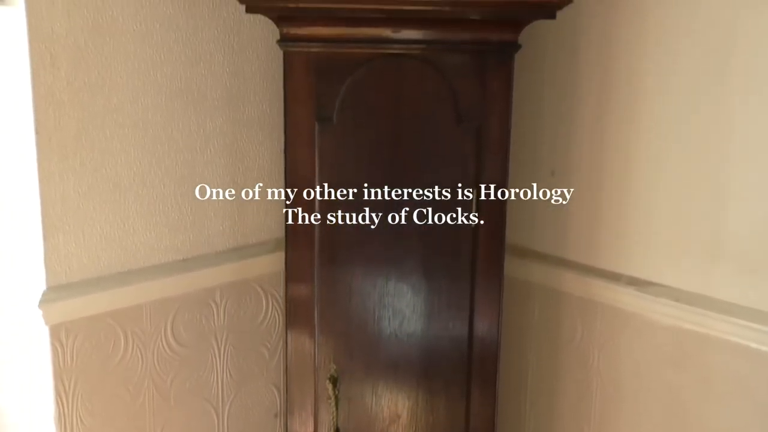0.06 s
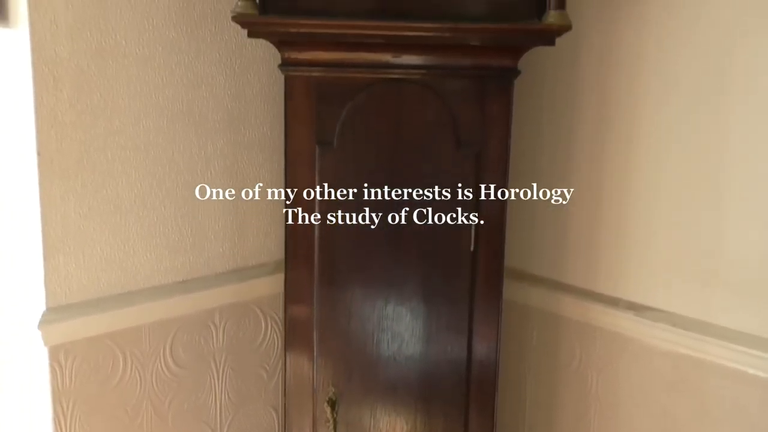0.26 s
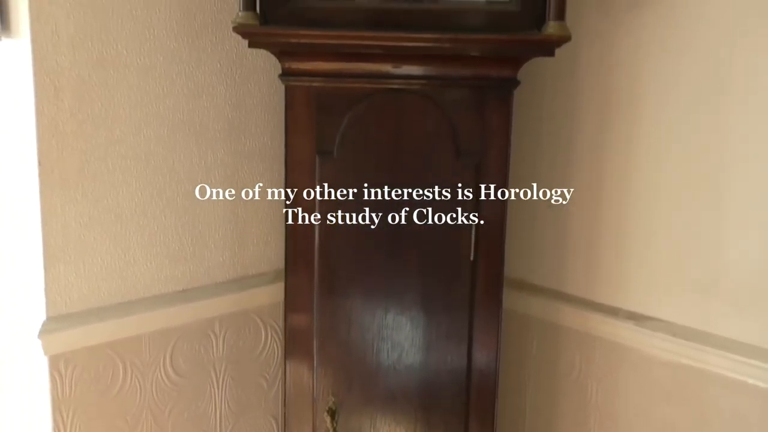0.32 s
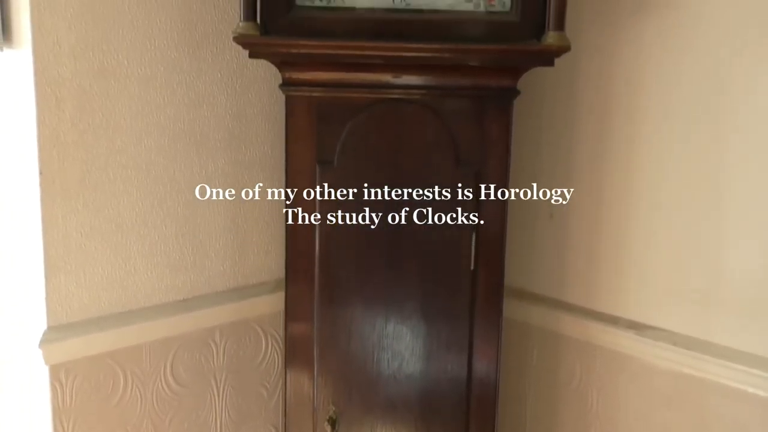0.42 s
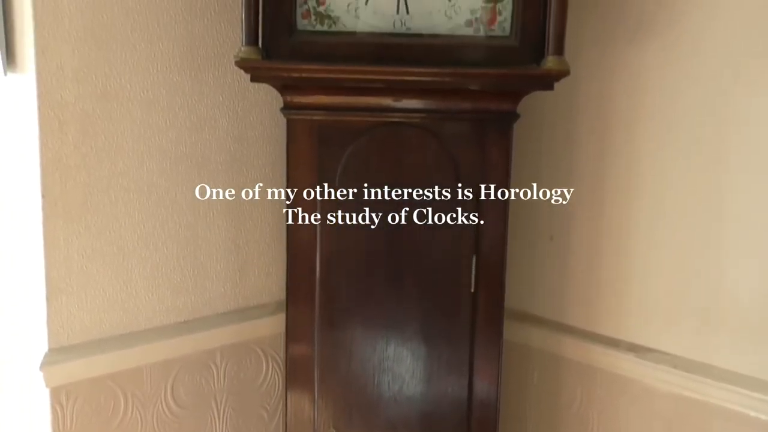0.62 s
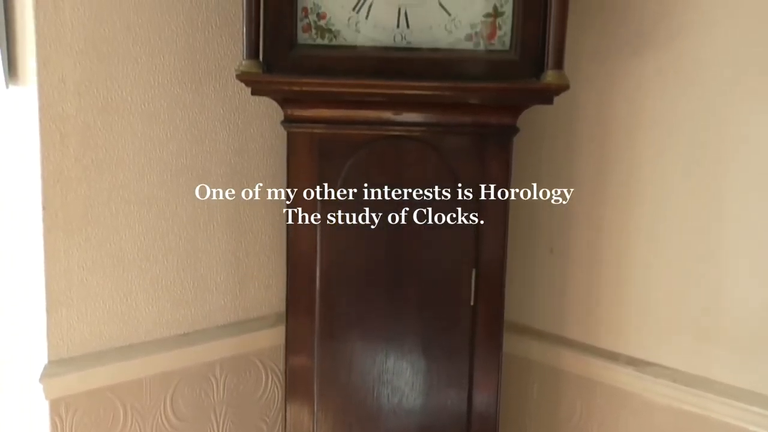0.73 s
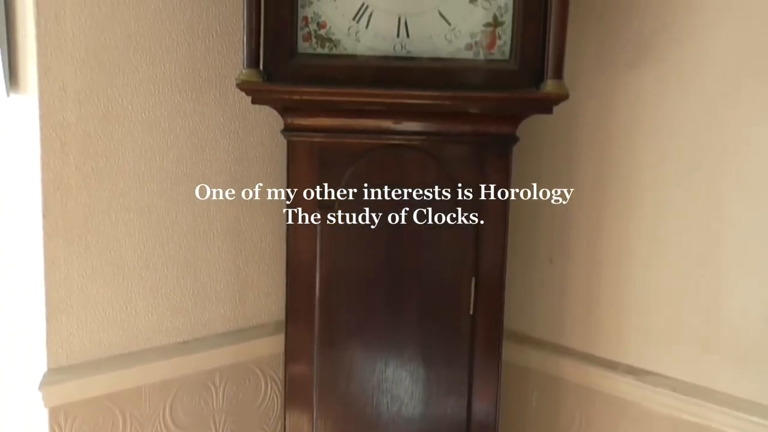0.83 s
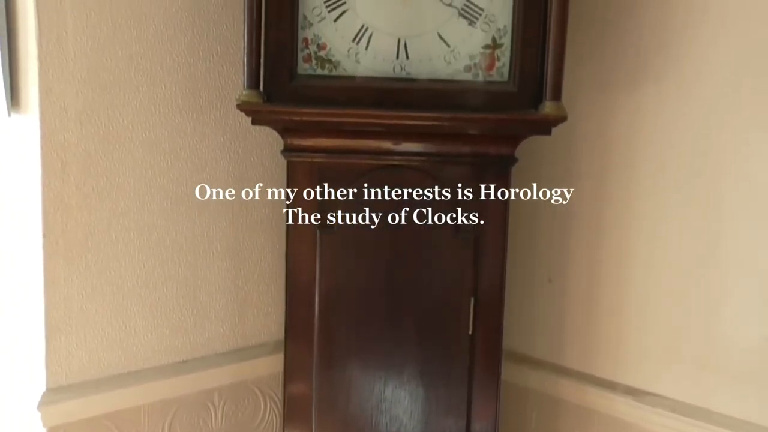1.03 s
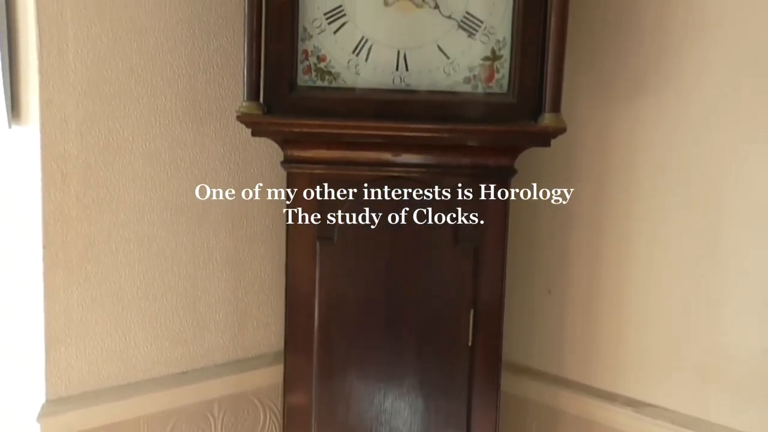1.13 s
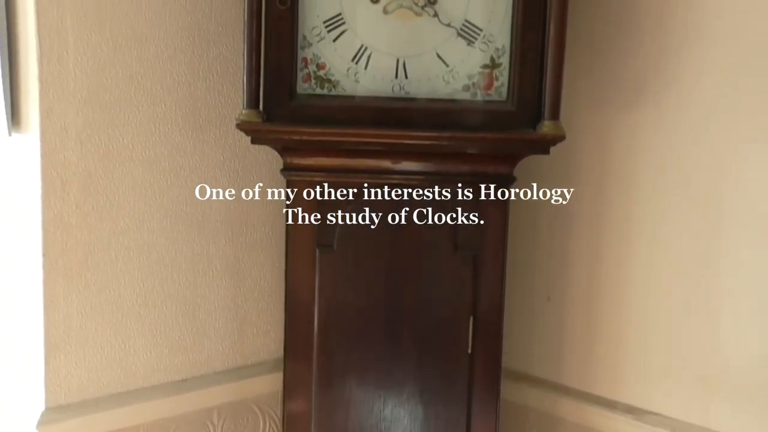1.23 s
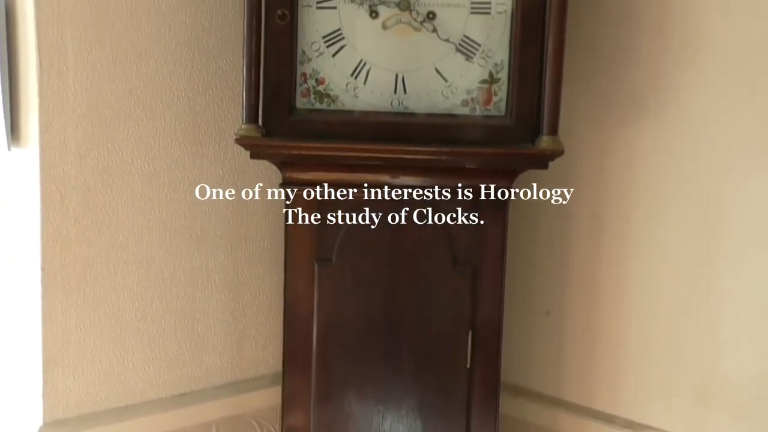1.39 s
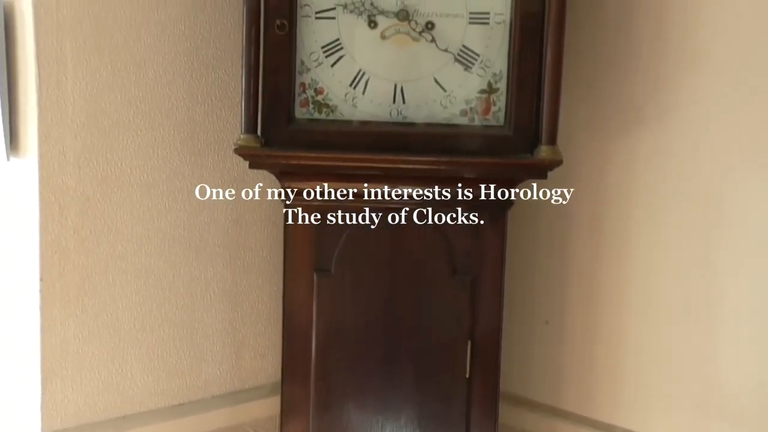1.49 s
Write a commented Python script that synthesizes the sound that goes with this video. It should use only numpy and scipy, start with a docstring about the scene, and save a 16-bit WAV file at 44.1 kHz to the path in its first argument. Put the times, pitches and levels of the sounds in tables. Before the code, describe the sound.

A longcase clock's bell, still faintly humming, is struck once after a soft rattle of levers. Its high notes die quickly and the lower ones ring on over clattering, whirring clockwork, heard close by in a quiet room.

```python
"""First comes a soft rattle of levers inside a longcase clock, its bell still humming from the last stroke.
Then the hammer lands with a bright clang in the small, quiet room. The bell's high notes die fast;
the low ones ring on and waver, because they come in close pairs that beat against each other.
All along, the gears that drive the hammer whirr, and now and then levers clatter in the wooden case."""
import sys
import numpy as np
from scipy import signal
from scipy.fft import rfft, irfft
from scipy.io import wavfile
from scipy.ndimage import uniform_filter1d

SR = 44100
rng = np.random.default_rng(int(sys.argv[2]) if len(sys.argv) > 2 else 0)


def persist_wave(psi):
    """Save psi, clipped to +-1, as 16-bit WAV."""
    counts = np.round(np.clip(psi, -1, 1) * 32767).astype(np.int16)
    wavfile.write(sys.argv[1], SR, np.atleast_2d(counts).T)


N = 68355
TIME = np.arange(N) / SR
FREQS = np.maximum(np.arange(N // 2 + 1) * SR / N, 1)
EARLIER_STROKE_S, STROKE_S = -3.5, 0.2385
TOUCH_LEAD_S = 0.018   # the hammer touches lightly this long before the full blow
CLANG_ATTACK_S, CLANG_HOLD_S = 0.014, 0.011
SWELL_S = 0.0043   # the ring builds up as it escapes the clock's hood
TREBLE_HZ = 4400


def from_db(db):
    """Turn decibels into a gain."""
    return 10 ** (np.asarray(db) / 20)


def pan(balance_db):
    """Left and right gains; a positive balance leans left."""
    return from_db(np.array([[1], [-1]]) * balance_db / 2)


def curve(points):
    """Join points into a line across all frequencies, giving each octave equal room."""
    hz, value = np.transpose(points)
    return np.interp(np.log(FREQS), np.log(hz), value)


def envelope(start, attack, hold, t60):
    """Rise, hold, then fade by 60 dB every t60 seconds."""
    age = TIME - start
    return np.clip(age / attack, 0, 1) * from_db(-60 * np.maximum(age - attack - hold, 0) / t60)


def resonance(hz, width_hz):
    """A steep peak around one pitch, with a total power of one."""
    power = 1 / (1 + ((FREQS ** 2 - hz ** 2) / (FREQS * width_hz)) ** 2) ** 2
    return np.sqrt(power / (power.sum() * SR / N))


# Each row: frequency in Hz, how alike the two ears hear the room, from 0 to 1.
EAR_LIKENESS = [(50, 0.7), (250, .55), (700, 0.31), (2000, 0.49), (12000, 0.4)]
# Each row: frequency in Hz, how much louder the left side is in dB.
ROOM_BALANCE = [(30, -3.5), (90, -2), (300, -0.5), (1500, -1), (5000, 0), (12000, 0)]

def room_noise(gain):
    """Noise shaped by a gain for each frequency, partly alike in both ears."""
    alike = curve(EAR_LIKENESS)
    mid, side = rfft(rng.standard_normal((2, N)))
    pair = np.sqrt(1 + alike) * mid + np.sqrt(1 - alike) * side * np.array([[1], [-1]])
    return irfft(pair * pan(curve(ROOM_BALANCE)) * gain * np.sqrt(SR) / 2, N)


def knock(gain, start, attack, hold, t60):
    """One burst of sound in the case; its treble fades first."""
    low_share = 1 / (1 + (FREQS / TREBLE_HZ) ** 4)
    low = room_noise(gain * np.sqrt(low_share)) * envelope(start, attack, hold, t60)
    high = room_noise(gain * np.sqrt(1 - low_share)) * envelope(start, attack, hold, 0.7 * t60)
    return low + high


def ripple(depth_db=6.5, spacing_hz=110.36):
    """Random peaks and dips in dB from many small resonances of brass and wood, weaker in the bass."""
    bumps = np.interp(FREQS / spacing_hz, np.arange(1000), rng.standard_normal(1000))
    return depth_db * bumps * np.minimum(FREQS / TREBLE_HZ, 1)


def contacts(per_second=91, fade_s=0.00043, depth=0.15):
    """A jittery gain from many tiny metal contacts in quick succession."""
    clicks = (rng.random(N) < per_second / SR) * rng.exponential(1, N)
    grains = signal.lfilter([1], [1, -np.exp(-1 / (fade_s * SR))], clicks + 1e-18)
    gain = 1 + depth * grains
    return gain / np.sqrt(np.mean(gain ** 2))


# The tone of the gears and the room. Each row: frequency in Hz, level in dB per Hz.
WHIRR_TONE = [(20, -102), (42, -89.5), (62, -102), (112, -76), (148, -90.5), (200, -80.5), (480, -83.5),
              (900, -89), (1400, -92), (2200, -99), (4000, -102), (8000, -107), (15000, -109)]

def whirr():
    """The running gears and the room make a steady, low noise."""
    return room_noise(from_db(curve(WHIRR_TONE)))


# The tone all clatters share. Each row: frequency in Hz, level in dB per Hz.
CLATTER_TONE = [(60, -102), (220, -80), (600, -78), (1150, -88), (1600, -80.5), (2300, -91), (3500, -88.5),
                (6000, -90), (6900, -98), (7700, -93), (9500, -95.5), (15000, -110)]
# Notes of the case and clockwork that every clatter wakes. Each row: pitch in Hz, level in dB.
CASE_NOTES = [(509, -62), (1175, -59.5), (2670, -71), (4150, -63.5)]
# Lever movements. Each row: start, rise and hold in seconds, boosts in dB for the body, the treble
# and the very top, then the pitch in Hz and level in dB of one ringing part.
LEVER_MOVES = [ (-.01, 0.014, 0.095, -7.5, -1, -8.5, 1640, -61),
               (0.107, 0.014, 0.045, -10, -6, -14.5, 1400, -68.5),
               (0.555, 0.0038, 0.0082, 1, -8.5, 1.5, 8800, -56),
               (0.582, 0.017, 0.011, -10, -7.5, -12.5, 653, -46),
               (0.653, 0.027, 0.022, 3.5, 4, -8.5, 992, -45.5), (0.809, .018, 0.02, 0.5, 6, 0, 992, -47.5),
               (1.057, 0.0066, .008, -20.5, -26, -15, 2180, -74),
               (1.372, 0.024, 0.025, -9.5, -11, -11, 1170, -63)]

def levers(t60=0.31, width_hz=45):
    """Each lever movement is a short rattle that wakes the case and one ringing part."""
    out = np.zeros((2, N))
    case = sum(from_db(db) * resonance(hz, width_hz) for hz, db in CASE_NOTES)
    tone_db = curve(CLATTER_TONE) + ripple()
    for start, attack, hold, body_db, treble_db, top_db, note_hz, note_db in LEVER_MOVES:
        boost_db = curve([(TREBLE_HZ / 2, body_db), (TREBLE_HZ, treble_db),
                          (6500, treble_db), (7550, top_db)])
        notes = from_db(body_db) * case + from_db(note_db) * resonance(note_hz, width_hz)
        out += knock(from_db(tone_db + boost_db), start, attack, hold, t60) * contacts()
        out += knock(notes, start, attack, hold, t60)
    return out


# The tone of the hammer's clang. Each row: frequency in Hz, level in dB per Hz.
CLANG_TONE = [(40, -76), (120, -81), (350, -70.5), (800, -79), (1230, -71.5), (1600, -79), (2500, -76.5),
              (4500, -68), (7000, -76), (10500, -70), (14000, -89), (15500, -97)]
# The tone of the shuddering case. Each row: frequency in Hz, level in dB per Hz.
SHUDDER_TONE = [(30, -99), (50, -83.5), (80, -74), (140, -74), (300, -85), (900, -115)]

def hammer(stem_hz=1212, stem_db=-43.5):
    """Iron clangs on bell metal, the hammer's stem clanks and the case shudders after the blow."""
    touch_s = STROKE_S - TOUCH_LEAD_S
    clang_gain = from_db(curve(CLANG_TONE) + ripple())
    clang = knock(clang_gain, touch_s, CLANG_ATTACK_S, CLANG_HOLD_S, t60=0.3) * contacts()
    stem = from_db(stem_db) * np.sin(2 * np.pi * stem_hz * TIME)
    clank = stem * envelope(touch_s, SWELL_S, hold=0, t60=0.29)
    rumble = room_noise(from_db(curve(SHUDDER_TONE)))
    shudder = rumble * envelope(STROKE_S, attack=0.065, hold=0, t60=1.9)
    return clang + clank + shudder


# How far the ring lags in the right ear. Each row: frequency in Hz, lag in radians.
RIGHT_EAR_LAG = [(705, -0.31), (1731, -0.36), (3072, -0.78), (3082, -1.17), (4684, -.03), (6455, -0.97),
                 (6517, -2.26), (7700, -1.1), (13400, 0.87)]
# The notes the bell rings with. Each row: pitch in Hz, level in dB, seconds to fade by 60 dB,
# how much louder the left side is in dB.
BELL_NOTES = [ (699.0, -60, 60, -1), (705.4, -48.8, 90, -2), (1731.4, -41.8, 20, 2.3),
              (1769.8, -56, 18, 3.5), (3071.8, -37.5, 8.5, -3), (3081.9, -34.2, 8.5, -5.5),
              (4634.5, -43, 1.8, 0), (4684.1, -15.3, 3.5, 2), (6455.3, -37.5, 1.5, -2),
              (6517.5, -24, 1.15, 1), (6577.5, -33, .3, -2), (7763, -60, 1.7, -2), (8433, -42, .25, 8),
              (8576, -33, .29, -10), (8729, -38, .21, 0), (8806, -24, .21, -2), (8891, -35, .23, 2),
              (9368, -56, 1.2, -8), (9794, -37, .19, -7), (10406, -43, .36, 6), (10865, -42, .28, -9),
              (10958, -37, .25, -6), (11038, -40, .24, -6), (11966, -47, .25, -2), (12687, -46, .28, -6),
              (13406, -35, .26, 6), (13790, -49, .31, 0), (14001, -47, .25, 0), (14268, -44, .27, 7),
              (15711, -47, .31, 3)]

def bell_ring(start, touch_db=-17.5):
    """One stroke sets all the bell's notes ringing: a light first touch, then the full blow."""
    age, touch_share = TIME - start, from_db(touch_db)
    out = np.zeros((2, N))
    for hz, db, t60, balance_db in BELL_NOTES:
        lag = np.array([[0], [np.interp(hz, *np.transpose(RIGHT_EAR_LAG))]])
        touch = touch_share * envelope(start - TOUCH_LEAD_S, SWELL_S, 0, t60)
        blow = (1 - touch_share) * envelope(start, SWELL_S, 0, t60)
        out += from_db(db) * pan(balance_db) * (touch + blow) * np.sin(2 * np.pi * hz * age - lag)
    return out


def bell(scatter_db=-1, scatter_above_hz=7700):
    """The new stroke takes over from the old hum; its high notes briefly scatter around the room."""
    handover = np.clip((TIME - STROKE_S) / SWELL_S, 0, 1)
    old_hum = bell_ring(EARLIER_STROKE_S) * (1 - handover)
    power = sum((from_db(db) * resonance(hz, width_hz=110)) ** 2 for hz, db, _, _ in BELL_NOTES)
    highs = 1 / (1 + (scatter_above_hz / FREQS) ** 4)
    scatter = room_noise(from_db(scatter_db) * np.sqrt(power) * highs)
    scatter *= envelope(STROKE_S - TOUCH_LEAD_S, CLANG_ATTACK_S, CLANG_HOLD_S, t60=0.24)
    return old_hum + bell_ring(STROKE_S) + scatter


def scene():
    """Bell, hammer and levers over the steady whirr."""
    return bell() + hammer() + levers() + whirr()


LIMIT_DB, RELEASE_DB_PER_S = -20, 17
LIMIT_WINDOW_S, LIMIT_ATTACK_S = 0.0087, 0.0038
CUTOFF_HZ = 15750

def record(dry):
    """A limiter turns the loud stroke down and lets go as it fades; the highest treble is cut off."""
    power = uniform_filter1d(np.mean(dry ** 2, axis=0), int(LIMIT_WINDOW_S * SR))
    over_db = np.maximum(10 * np.log10(np.abs(power) + 1e-12) - LIMIT_DB, 0)
    release_db = RELEASE_DB_PER_S * TIME
    cut_db = np.maximum.accumulate(over_db + release_db) - release_db   # jumps up, sinks slowly
    smoothing = np.exp(-1 / (LIMIT_ATTACK_S * SR))
    gain_db = signal.lfilter([1 - smoothing], [1, -smoothing], -cut_db)
    lowpass = signal.ellip(12, 0.1, 80, CUTOFF_HZ, fs=SR, output="sos")
    return signal.sosfilt(lowpass, dry * from_db(gain_db))


dry = scene()
out = record(dry)
persist_wave(out)
```